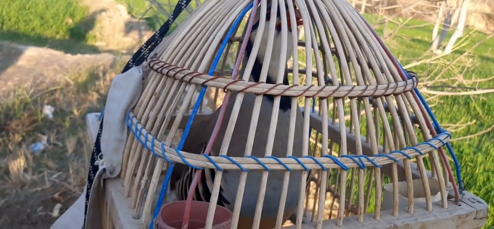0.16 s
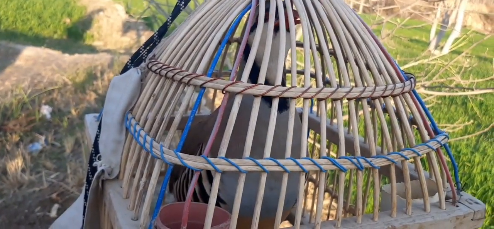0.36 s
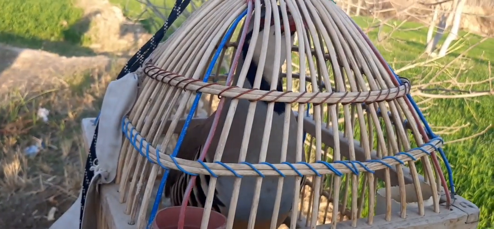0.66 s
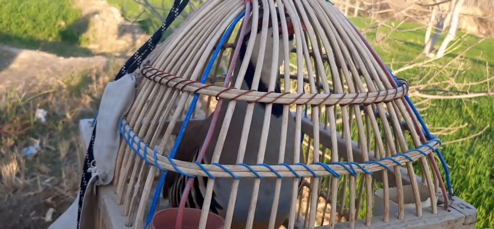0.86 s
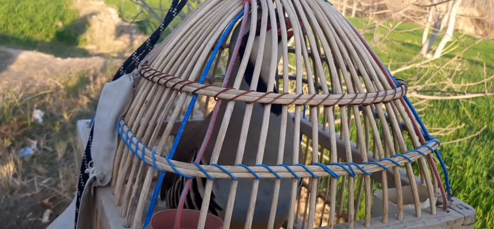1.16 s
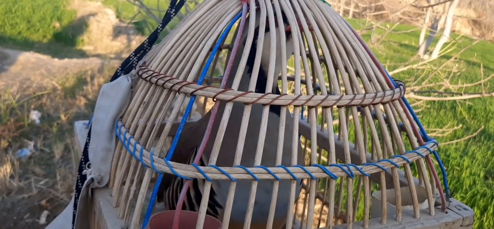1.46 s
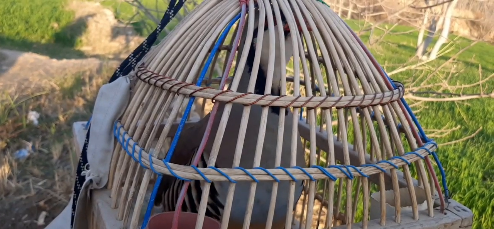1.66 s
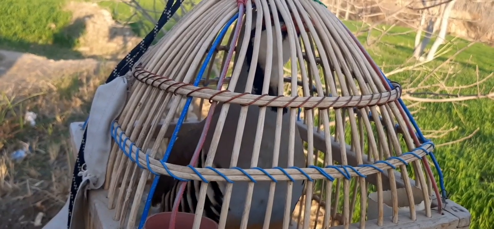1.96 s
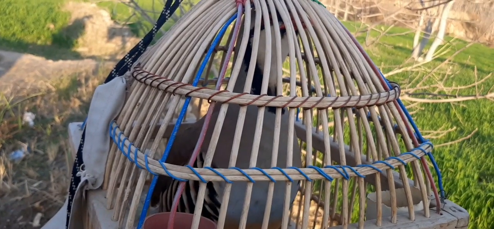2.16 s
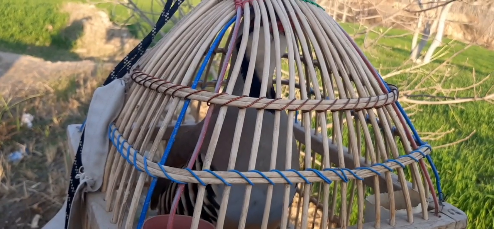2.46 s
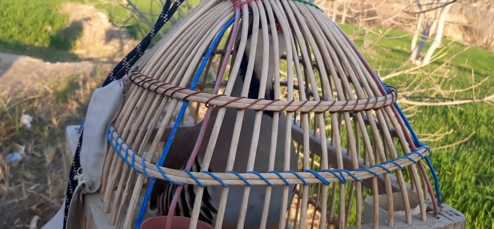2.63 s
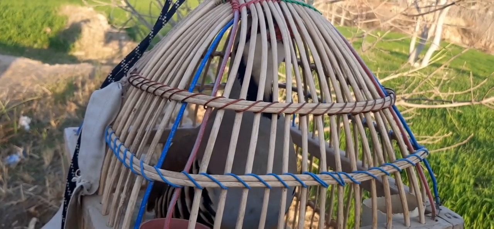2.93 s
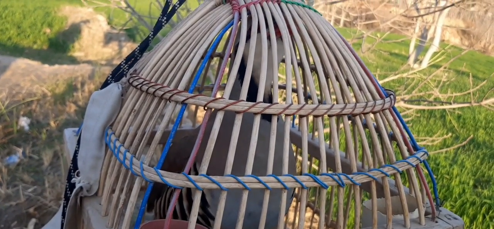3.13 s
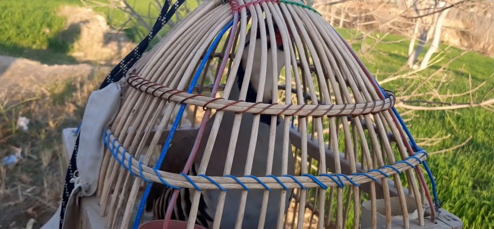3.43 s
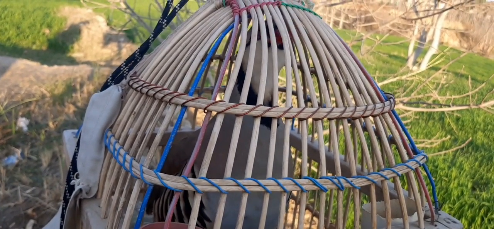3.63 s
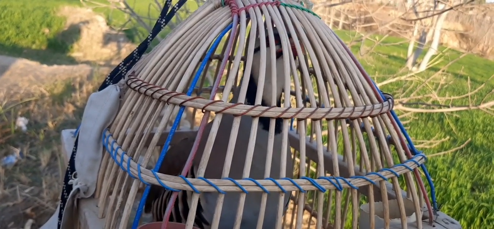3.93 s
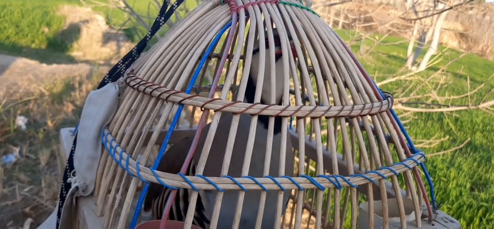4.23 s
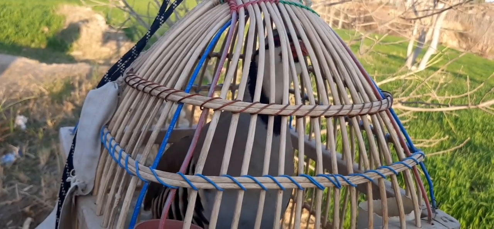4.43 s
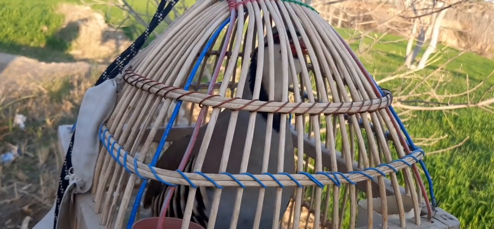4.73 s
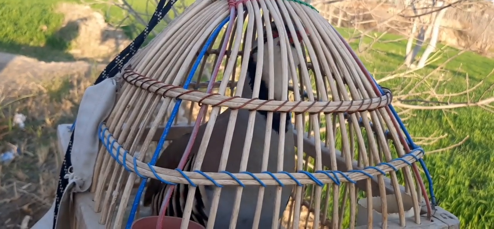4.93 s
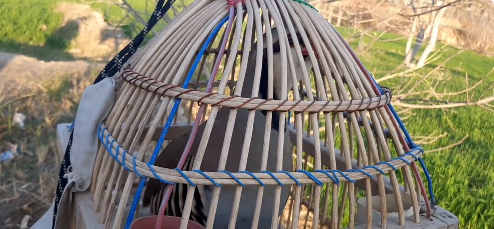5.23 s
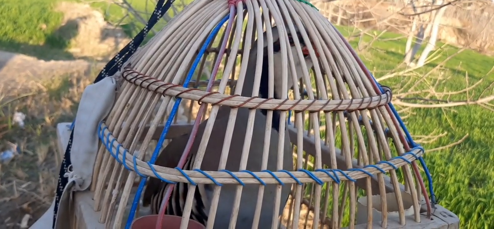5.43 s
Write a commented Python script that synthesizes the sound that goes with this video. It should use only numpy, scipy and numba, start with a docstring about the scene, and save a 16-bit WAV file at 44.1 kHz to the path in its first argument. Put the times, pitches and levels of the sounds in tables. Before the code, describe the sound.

Close, harsh clucking from a caged partridge repeats a quick three-note phrase outdoors, with faint small birds far off.

```python
"""A chukar partridge calls close by from a wicker cage on a field: chuck, chu-kar, again and again.
Short chucks, soft upbeats and long accented notes each keep one shape; twice the pair is slurred.
The syrinx starts on a high voice and breaks into a rough low one that sags; both ring throat and beak.
Soft hisses fall between the first notes. Small birds whistle far off over faint rustles, light wind
and the murmur of a very quiet field."""
import sys
import numpy as np
from scipy import signal
from scipy.fft import rfft, irfft
from scipy.io import wavfile
from scipy.ndimage import uniform_filter1d
from numba import njit

SR = 44100
rng = np.random.default_rng(int(sys.argv[2]) if len(sys.argv) > 2 else 0)


def unload_wav(signal):
    """Save mono or channel-first audio to the path in sys.argv[1] as 16-bit WAV at rate SR, clipped to [-1, 1]."""
    wavfile.write(
        sys.argv[1],
        SR,
        np.round(np.clip(np.atleast_2d(signal).T, -1, 1) * 32767).astype(np.int16),
    )


N = 246519
TOP_HZ = 16100
LEAD_S = .012  # silence ahead of each note


def partridge():
    """Run of chucks, chus, kars and slurs; reaches the left microphone first."""
    # each: start/s, end/s, level/dB, voice break after start/s, high voice/Hz, roughness/0-1, treble/dB
    chucks = [(.072, .107, -14.5, 0.00563, 862.5, 0.32, -20), (.489, .525, -11.5, .008, 839.6, 0.53, -20),
              (.945, .996, -14, 0.01026, 830, 0.25, -19), (1.42, 1.462, -12, 0.00865, 750.3, 0.4, -20.5),
              (1.83, 1.877, -11, 0.0142, 780, 0.41, -20), (2.254, 2.301, -15.5, 0.01264, 810, 0.73, -18.5),
              (2.702, 2.744, -12, 0.01245, 755, 0.31, -19), (3.154, 3.198, -15, 0.01595, 788, 0.26, -19),
              (3.607, 3.649, -15.5, 0.0156, 723, 0.49, -20.5),
              (4.062, 4.097, -14.5, 0.0113, 775.4, 0.61, -19), (4.527, 4.566, -14, 0.0064, 789, 0.54, -22),
              (4.987, 5.029, -13, 0.01453, 755, 0.32, -23), (5.455, 5.492, -12, 0.00885, 780, 0.62, -19.5)]
    chus = [(.204, .252, -17.5, 0.0351, 800, 0.61, -16.5), (.628, .664, -19, 0.028, 850.1, 0.54, -13),
            (1.123, 1.161, -20.5, 0.0297, 856.2, 0.66, -10), (2.397, 2.448, -22.5, 0.094, 853, 0.11, -13.5),
            (2.837, 2.892, -21, 0.039, 919, 0.51, -8.5), (3.299, 3.337, -21, 0.00946, 866, 0.52, -11.5),
            (3.745, 3.778, -22.5, 0.01217, 877.8, .49, -12), (4.21, 4.24, -20, 0.0118, 884.4, .44, -11),
            (4.676, 4.712, -18.5, .069, 897, 0.52, -15), (5.136, 5.174, -19.5, 0.01213, 827, 0.5, -10.5)]
    kars = [(.274, .35, -14, 0.012, 802, 0.61, -19), (.707, .784, -10.5, 0.0382, 772, 0.21, -17),
            (1.2, 1.273, -8, 0.0365, 793, 0.27, -15.5), (2.484, 2.561, -10, 0.0442, 815, .35, -14.5),
            (2.93, 3.009, -12.5, 0.01137, 831, 0.31, -12), (3.391, 3.469, -14, 0.04506, 820, 0.21, -16),
            (3.836, 3.91, -15, 0.0476, 803, .37, -17.5), (4.296, 4.375, -15.5, 0.0242, 919, 0.5, -17.5),
            (4.763, 4.827, -13.5, 0.0365, 806, 0.42, -19.5), (5.226, 5.292, -13, 0.031, 802, 0.47, -18.5)]
    # start/s, end/s, level/dB, voice break after start/s
    slurs = [(1.562, 1.688, -12, .08), (1.976, 2.113, -13.5, .028)]
    chuck = dict(rise_db=4, crest=.33, fall_db=7.5, overshoot=.08, end_hz=272.8,  # short, loud early
                 throat_hz=1458, onset_db=-15.5, lower_db=-8)
    chu = dict(rise_db=0, crest=.19, fall_db=3.5, overshoot=.1, end_hz=433.26,  # hollow upbeat
               throat_hz=1454, onset_db=-3.5, lower_db=-1)
    kar = dict(rise_db=10, crest=.598, fall_db=5, overshoot=.045, end_hz=268.96,  # long, swelling
               throat_hz=1494.1, onset_db=-.5, lower_db=-9)
    slur = dict(rise_db=2.5, crest=.91, fall_db=2, overshoot=.11, end_hz=290.7,  # chu-kar in one
                throat_hz=1444.5, onset_db=-9.5, lower_db=-8.5, high_hz=803, rough=.33, treble_db=-13.5)
    out = np.zeros((2, N))
    for rows, shape in (chucks, chuck), (chus, chu), (kars, kar), (slurs, slur):
        for start_s, end_s, *voice in rows:
            add(out, start_s - LEAD_S, note(end_s - start_s, *voice, **shape))
    return np.array([out[0], np.roll(out[1], 2)])


def note(length_s, db, break_s, high_hz, rough, treble_db,
         rise_db, crest, fall_db, overshoot, end_hz, throat_hz, onset_db, lower_db):
    """One note: syrinx through throat and beak, swelling and fading with the air pressure."""
    # throat passband: f/Hz, gain/dB
    passband = [(120, -12), (290, 0), (1750, 0), (2100, -4.5), (3200, -9.5), (6000, -20.5)]
    t = np.arange(int((length_s + 3 * LEAD_S) * SR)) / SR - LEAD_S
    sag = np.clip((t - length_s) / .026 + 1, 0, 1.15)  # membranes slacken as pressure drops
    waver = 1 + .025 * wobble(len(t), 45)
    source, low_voice = syrinx(t, length_s, sag, waver, break_s, high_hz, end_hz, rough, overshoot)
    balance_db = np.interp(t, [.007, .022], [onset_db, lower_db])  # lower resonances as the beak opens
    body = throat(source, low_voice, t, sag, waver, throat_hz, balance_db, onset_db > lower_db)
    pressure = air_pressure(t, length_s, db, rise_db, crest, fall_db)
    # soft pulses and a closed beak carry less treble
    drive = air_pressure(t, length_s, db, .19 * rise_db, crest, .19 * fall_db)
    muffle_db = -4 * sag ** 2 - .14 * np.maximum(balance_db - lower_db, 0)
    bite = drive * (drive / drive.max()) ** .69 * undb(muffle_db)
    turbulence = unit(colour(rng.standard_normal(len(t)), [(2500, -19.5), (5000, -10.5), (9000, -3.5)]))
    rasp = steady(beak(unit(source) + undb(3) * turbulence), .024)
    treble = rasp * unit(bite) * np.sqrt(np.mean(pressure ** 2))
    return undb(1.4425) * colour(pressure * body, passband) + undb(treble_db + 2) * treble


def air_pressure(t, length_s, db, rise_db, crest, fall_db,
                 attack_s=.0075, release_s=.01217, threshold_db=-36, flutter_db=1.695):
    """Attack from the voicing threshold, swell to the crest (share of the length), fall, release."""
    held_s = length_s - release_s
    crest_s = np.clip(crest * length_s, attack_s, held_s)
    times_s = [-LEAD_S, -.002, 0, attack_s, crest_s, held_s,
               length_s, length_s + .0099, length_s + 2 * LEAD_S]
    levels_db = [-100, -68, threshold_db, db - rise_db, db, db - fall_db, threshold_db, -60, -100]
    return undb(np.interp(t, times_s, levels_db) + flutter_db * wobble(len(t), 130))


def syrinx(t, length_s, sag, waver, break_s, high_hz, end_hz, rough, overshoot, low_hz=513.83):
    """High voice starts sharp, settles, breaks into the low. Returns the mix and the gated low voice."""
    low_share = .5 + .5 * np.tanh((t - break_s) / .0013)
    settle = 1 - .035 * t / length_s + overshoot * np.exp(-np.maximum(t, 0) / .01586)
    high_pitch_hz = high_hz * waver * settle * (1 - .14 * sag ** 2)
    high = (1 - .85 * low_share) * membrane(high_pitch_hz, rough + .06)
    low_pitch_hz = (low_hz + (end_hz - low_hz) * sag) * (1 + .035 * wobble(len(t), 60))
    low_rough = rough * np.clip(1 - 1.05 * sag, .2, 1)  # the sag runs clean
    low = (low_share + .54 * rough) * membrane(low_pitch_hz, low_rough)
    return high + low, low * low_share


def membrane(hz, rough, jitter=.11, shimmer=.993):
    """One side of the syrinx: uneven pulses, each with a puff of air."""
    n = len(hz)
    uneven_hz = hz * (1 + jitter * rough * wobble(n, 498.78))
    phase = 2 * np.pi * (np.cumsum(uneven_hz) / SR + rng.random())
    harmonic = np.arange(1, 48)[:, None]
    pulses = unit(np.sum(np.cos(harmonic * phase) * (harmonic * hz < TOP_HZ), axis=0))
    puffs = unit((1 + np.cos(phase)) ** 2 * rng.standard_normal(n))
    return pulses * np.exp(shimmer * rough * np.tanh(wobble(n, 400))) + rough * puffs


def throat(source, low_voice, t, sag, waver, throat_hz, balance_db, starts_closed):
    """Main resonance arches as the beak opens and shuts; lower ones and the chest ring beneath."""
    # lower resonances: f/Hz, width/Hz, gain/dB, left minus right/dB
    modes = [(839.7, 253, 5, -5), (1155.4, 120, 5, -2)]
    # grows as the throat relaxes
    shoulder = resonate(source, throat_hz * (.88 - .0067 * sag), 300) * undb(-9 + 11.13 * sag)
    opening = np.exp(-np.maximum(t, 0) / .04555) * starts_closed
    arch = 1.04 - .1199 * sag ** 1.406 - .1903 * opening
    main = pan(unit(resonate(source, throat_hz * arch * waver, width_hz=93.9) + shoulder), -3)
    chest = pan(undb(-5.5) * resonate(low_voice, 368.5, width_hz=260), -3.5)
    lower = sum(pan(undb(db) * resonate(source, hz, width_hz), pan_db)
                for hz, width_hz, db, pan_db in modes)
    return steady(main + undb(balance_db + 10.23 * (sag - 1)) * unit(chest + lower), .004)


def beak(x):
    """Resonances of windpipe and open beak, parted by deep valleys; each is beamed its own way."""
    # f/Hz, half width/Hz, gain/dB, left minus right/dB, right lag/rad
    modes = [(1976.5, 150, -18.5, -2.5, -2.5), (2401, 250, -11, -7, 1.6), (2521, 310, -6.5, 3.5, 1.18),
             (2900.6, 190, -15, 5, 1.5), (3943, 360, -10, 4.5, 0.6526), (4400, 150, -14, 5, 0),
             (4737.1, 170, 6, 14, 0), (5082.5, 322.4, -5, 7, -0.68), (5588, 520, -25.5, 9.5, -0.35),
             (7341.6, 571, -29, 3, -0.1165), (9735, 550, -38, 0.5, -1), (11882, 1000, -25, 9.5, -1.34),
             (15000, 1500, -35, 2, -2.5)]
    f = np.fft.rfftfreq(len(x), 1 / SR)
    peaks = 0
    for hz, half_width_hz, db, pan_db, lag_rad in modes:
        peak = undb(db) * np.exp(-((f - hz) / half_width_hz) ** 2)
        peaks = peaks + pan(peak, pan_db) * np.exp(-1j * np.array([[0], [lag_rad]]))
    floor = undb(-49.5) * (f > modes[0][0])
    return irfft(rfft(x) * (peaks + floor), len(x))


def hisses(length_s=.06, bands_hz=(1530, 2100, 2600)):
    """Soft hisses in three broad bands, varied each time; they start quickly and thin out."""
    # t/s, level/dB
    events = [(.134, -39), (.393, -40.5), (.583, -40), (.839, -39.5), (1.019, -38), (1.16, -39),
              (1.265, -48.5)]
    # f/Hz, level/dB
    spectrum = [(400, -38), (1000, -16), (1500, -6), (2900, -7), (3800, -15), (5000, -19.5), (6800, -20.5),
                (8500, -45), (14000, -67)]
    out = np.zeros((2, N))
    t = np.arange(int((length_s + .054) * SR)) / SR
    times_s = [0, .01, length_s - .004, length_s + .0079, length_s + .061]
    shape_db = np.interp(t, times_s, [-30, 2, -4, -20, -45])
    for start_s, db in events:
        centres_hz = np.array(bands_hz) * (1 + .058 * rng.standard_normal(len(bands_hz)))
        noise = colour(rng.standard_normal(len(t)) + .5 * rng.standard_normal((2, len(t))), spectrum)
        bands = np.array([sum(resonate(side, hz, 420) for hz in centres_hz) for side in noise])
        envelope = undb(db + shape_db + 2.7 * wobble(len(t), 120))
        add(out, start_s - .004, pan(unit(noise + 2.1 * bands), -5.5) * envelope)
    return out


def reflections(sound, ring_hz=1580):
    """Bars scatter the treble, the cage rings briefly, ground and bushes return a faint dull tail."""
    t = np.arange(SR * 3 // 4) / SR
    fade = lambda t60_s: np.exp(-np.log(1000) * t / t60_s)
    unit_energy = lambda h: unit(h) / np.sqrt(len(t))
    build_up = np.minimum(t / .027, 1)
    scatter = lambda t60_s: unit_energy(rng.standard_normal((2, len(t))) * fade(t60_s) * build_up)
    highpass = signal.butter(2, 2300, "high", fs=SR, output="sos")
    lowpass = signal.butter(1, 2500, fs=SR, output="sos")
    ring = undb(-45) * unit_energy(np.sin(2 * np.pi * ring_hz * t) * fade(t60_s=.033))
    bars = signal.sosfilt(highpass, undb(-9) * scatter(t60_s=.024))
    far = signal.sosfilt(lowpass, undb(-44) * scatter(t60_s=.61))
    near = undb(-33) * scatter(t60_s=.17)
    return signal.fftconvolve(sound, bars + ring + near + far, axes=1)[:, :N]


def far_birds():
    """Small birds whistle glides that level off."""
    # t/s, length/s, first f/Hz, last f/Hz, level/dB
    whistles = [(1.299, .11, 4170, 2740, -63), (1.726, 0.108, 4270, 2757, -66.5),
                (2.117, 0.0526, 3550, 3360, -70), (2.55, 0.102, 3400, 3360, -72.5),
                (4.429, .07, 3640, 3500, -70.5), (4.888, .039, 4300, 3874, -60.5),
                (4.925, 0.04, 3300, 3700, -58), (5.081, 0.0602, 3300, 3680, -65.5)]
    out = np.zeros((2, N))
    for start_s, length_s, first_hz, last_hz, db in whistles:
        progress = np.linspace(0, 1, int(length_s * SR))
        glide_hz = last_hz + (first_hz - last_hz) * (1 - progress) ** 2.8
        hz = glide_hz * (1 + .014 * wobble(len(progress), 500))
        add(out, start_s, undb(db) * np.sin(np.pi * progress) * np.sin(2 * np.pi * np.cumsum(hz) / SR))
    return out


def rustles():
    """Faint flickering swells of broad noise."""
    # t/s, length/s, centre f/Hz, level/dB
    events = [(1.14, .2, 3403, -48.5), (2.306, 0.0254, 5000, -66.5), (4.558, 0.07, 5055, -68),
              (4.83, 0.309, 3900, -65), (4.941, 0.0153, 5400, -56)]
    out = np.zeros((2, N))
    for start_s, length_s, hz, db in events:
        n = int(length_s * SR)
        grain = np.array([unit(resonate(rng.standard_normal(n), hz, 1.2 * hz)) for _ in range(2)])
        add(out, start_s, grain * np.sin(np.linspace(0, np.pi, n)) * undb(db + 3.5 * wobble(n, 200)))
    return out


def field(gust_s=.06):
    """Low outdoor murmur, puffs of wind on the microphones, thin even hiss."""
    # t/s, level/dB
    murmur_levels = [(0.0, -82.5), (0.45, -78.5), (3.92, -80.5), (4.78, -75.5), (4.97, -71), (5.59, -79.5)]
    # t/s, rise/dB
    gusts = [(.491, 15.5), (.726, 16.5), (1.003, 20.5), (4.474, 17)]
    # f/Hz, level/dB
    air_spectrum = [(60, -9), (300, 1.5), (700, -10.5), (1400, -3), (2500, -7.5), (5000, -13.5),
                    (9000, -19), (15000, -23)]
    murmur_spectrum = [(30, -27), (55, -3), (95, -7.5), (140, 2.5), (200, -10.5), (500, -23.5),
                       (1500, -51)]
    wind_spectrum = [(15, -11), (50, .5), (100, -5), (300, -34.5), (1000, -62.5)]
    t = np.arange(N) / SR
    noise = lambda spread: rng.standard_normal(N) + spread * rng.standard_normal((2, N))
    murmur = unit(colour(noise(.5), murmur_spectrum))
    murmur *= undb(np.interp(t, *np.transpose(murmur_levels)) + 3 + 2.1 * wobble(N, 4.5))
    gust_db = sum(rise_db * np.exp(-((t - at_s) / gust_s) ** 2) for at_s, rise_db in gusts)
    wind = unit(colour(noise(2), wind_spectrum)) * undb(-80 + gust_db + 2 * wobble(N, 4.4))
    air = unit(colour(noise(.95), air_spectrum)) * undb(-73)
    return pan(murmur, -1) + pan(wind, -6) + pan(air, -4.5)


def undb(db):
    return 10 ** (np.asarray(db) / 20)


def unit(x):
    """Scale to rms 1."""
    return x / np.sqrt(np.mean(x ** 2) + 1e-18)


def pan(x, db):
    """Constant-power pan; db is left minus right."""
    return x * undb(np.array([[db], [-db]]) / 2) / np.sqrt(np.cosh(db * np.log(10) / 10))


def add(out, start_s, x):
    """Mix x into out from start_s on."""
    i = max(int(start_s * SR), 0)
    out[:, i:i + x.shape[-1]] += x[..., :N - i]


def colour(x, points):
    """Filter by (f/Hz, gain/dB) points."""
    hz, db = np.transpose(points)
    f = np.maximum(np.fft.rfftfreq(x.shape[-1], 1 / SR), 1)
    return irfft(rfft(x) * undb(np.interp(np.log(f), np.log(hz), db)), x.shape[-1])


def wobble(n, hz):
    """Random drift of spread 1, hz new values a second."""
    at = np.arange(n) * hz / SR
    return np.interp(at, np.arange(1024), rng.standard_normal(1024)) * np.sqrt(3 / 2)


@njit
def svf(x, hz, width_hz):
    """State-variable band-pass with a moving centre."""
    y, band_state, low_state = np.empty(len(x)), 0., 0.
    for i in range(len(x)):
        g, damping = np.tan(np.pi * hz[i] / SR), width_hz / hz[i]
        band = (band_state + g * (x[i] - low_state)) / (1 + g * (g + damping))
        band_state = 2 * band - band_state
        low_state += 2 * g * band
        y[i] = damping * band
    return y


def resonate(x, hz, width_hz):
    """Steep resonance: two band-passes in series."""
    centre_hz = np.minimum(hz, SR * .45) * np.ones(len(x))
    return svf(svf(x, centre_hz, float(width_hz)), centre_hz, float(width_hz))


def steady(x, window_s):
    """Hold stereo sound near level 1, keeping flutter faster than the window."""
    size = max(int(window_s * SR), 1)
    power = uniform_filter1d(uniform_filter1d(np.mean(x ** 2, axis=0), size), size)
    return x / np.sqrt(.93 * power + .07 * power.mean())


def scene():
    close = partridge() + hisses()
    return close + reflections(close) + far_birds() + rustles() + field()


def record(dry):
    """Clip at full scale, low-pass at TOP_HZ."""
    return signal.sosfilt(signal.ellip(10, .1, 80, TOP_HZ, fs=SR, output="sos"), np.clip(dry, -1, 1))


dry = scene()
out = record(dry)
unload_wav(out)
```